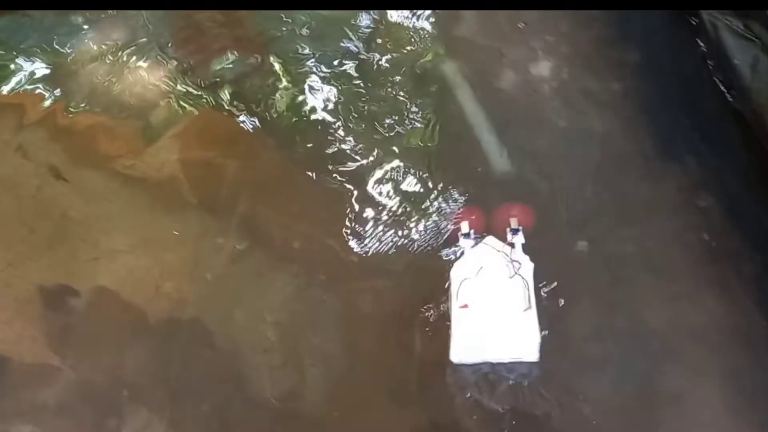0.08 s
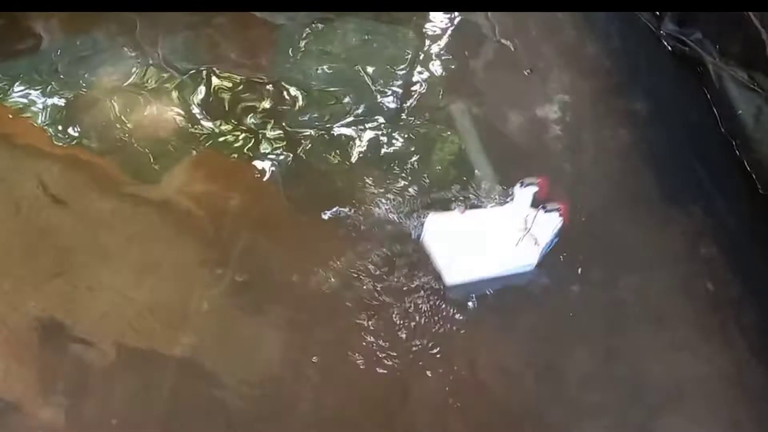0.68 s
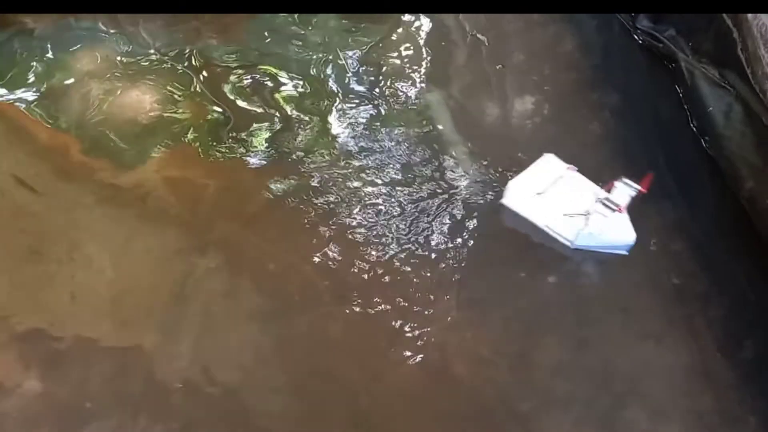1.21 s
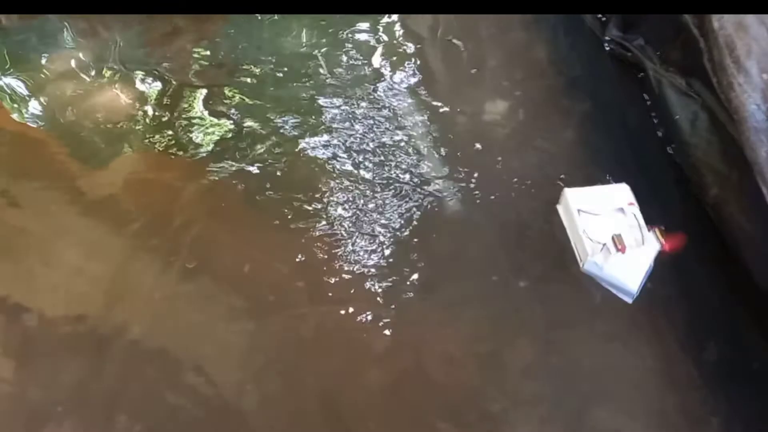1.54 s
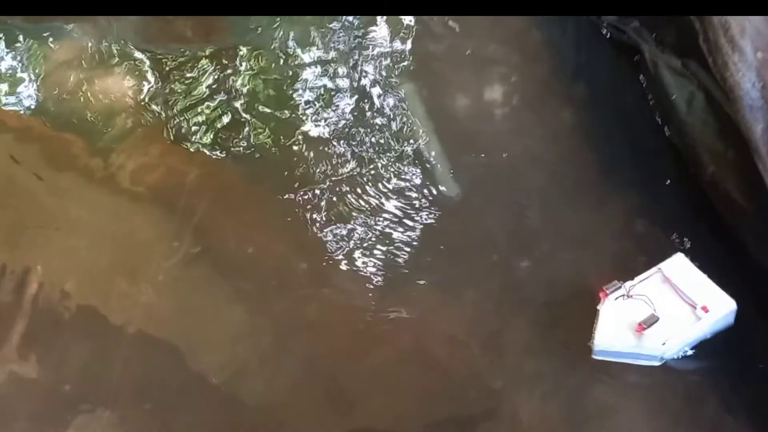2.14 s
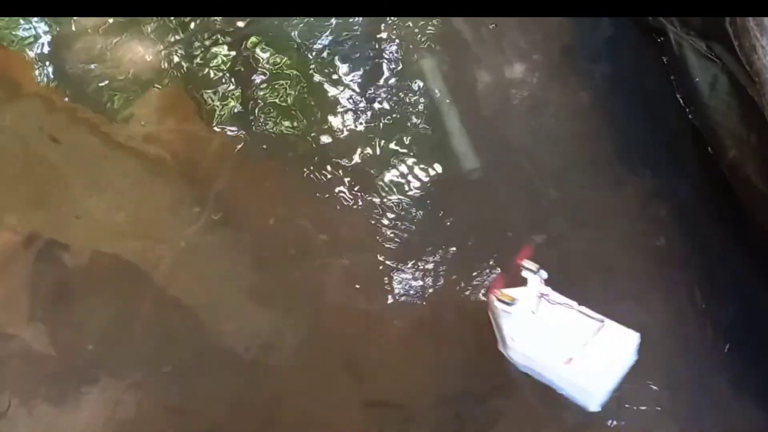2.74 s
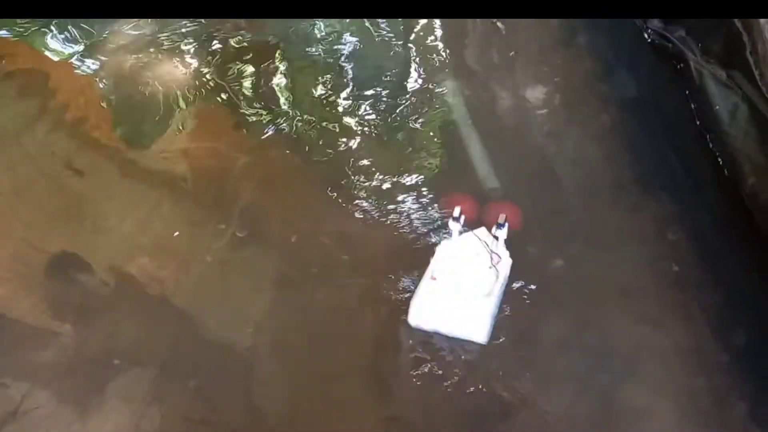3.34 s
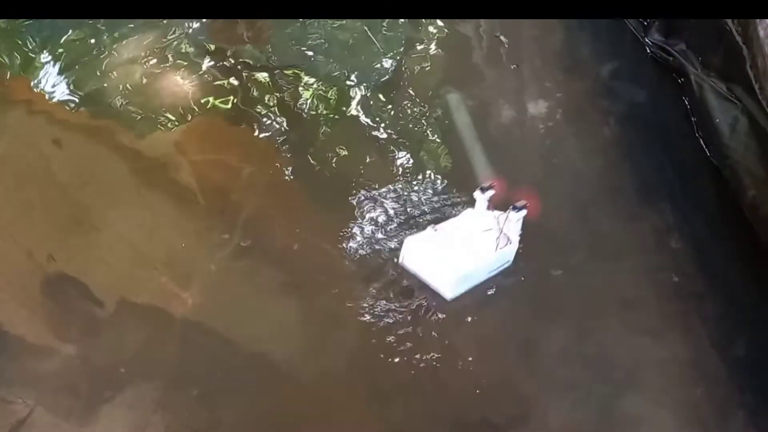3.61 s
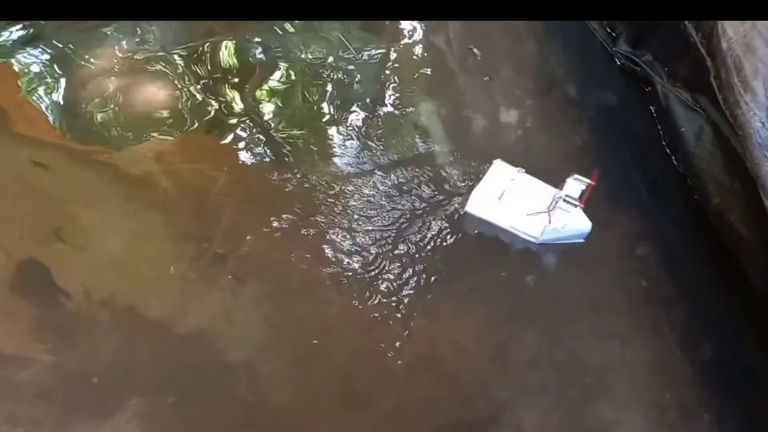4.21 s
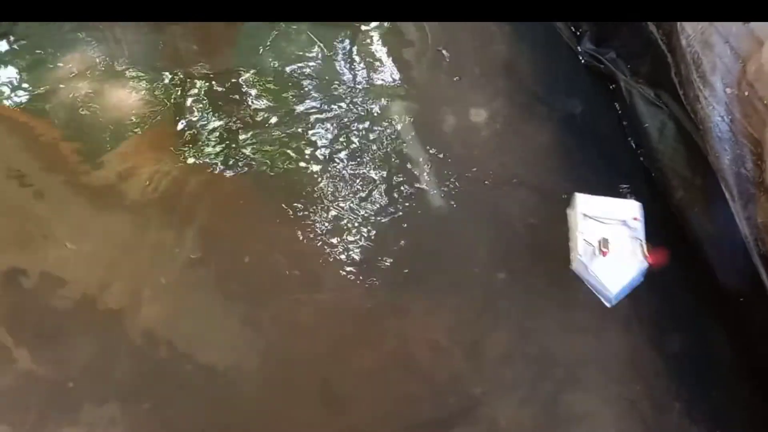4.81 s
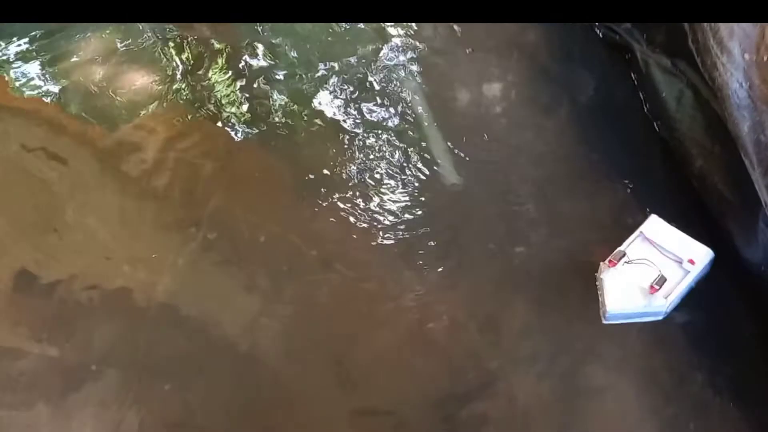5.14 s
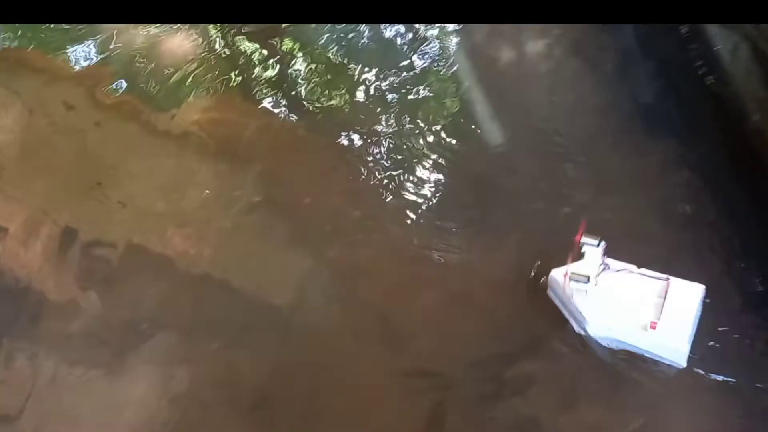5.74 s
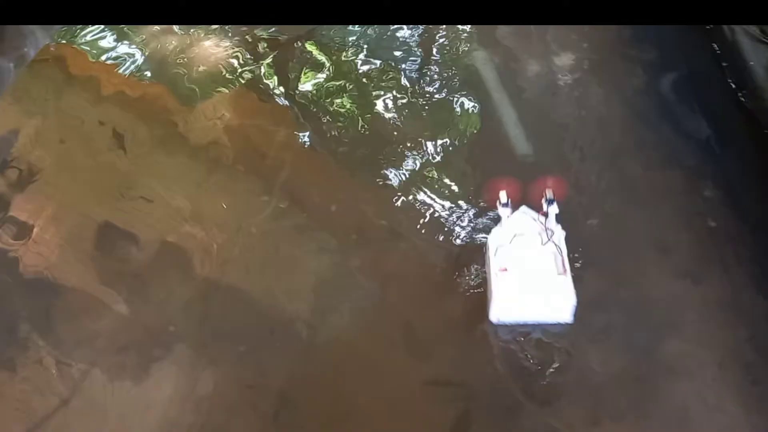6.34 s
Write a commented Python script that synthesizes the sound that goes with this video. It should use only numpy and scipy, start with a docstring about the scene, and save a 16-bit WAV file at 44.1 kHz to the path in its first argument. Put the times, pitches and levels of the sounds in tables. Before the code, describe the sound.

A steady, whining buzz with a fizzy hiss comes from the two electric air propellers of a toy foam boat, heard in stereo. The pitch barely changes, but overtones swell and fade as the boat goes round on the water. Short, light splashes occur early, near the middle and near the end, and a plop follows the middle ones. The background holds only a quiet rumble and a few soft thumps.

```python
"""On a pool, a toy foam boat goes in circles, pushed by two small electric motors with air propellers.
The motors whine about 20 turns a second apart, so their tones beat against each other.
As the boat swings round, each overtone sweeps past like the beam of a lighthouse.
Blades and motor brushes hiss, and the foam hull rings along. Behind it all lies a low rumble
with soft thumps, and the water gives a few splashes and plops."""
import sys
import numpy as np
from scipy import signal
from scipy.fft import rfft, irfft
from scipy.io import wavfile

SR = 44100
rng = np.random.default_rng(int(sys.argv[2]) if len(sys.argv) > 2 else 0)


def bounce(signal):
    """Save signal as a 16-bit WAV file at the path given by the first command-line argument."""
    frames = np.transpose(np.atleast_2d(signal))
    limited = np.clip(frames, -1, 1)
    pcm = np.round(limited * 32767).astype(np.int16)
    wavfile.write(sys.argv[1], SR, pcm)


N = 289296
T = np.arange(N) / SR
HZ = np.fft.rfftfreq(N, 1 / SR)


def gain_of(db):
    """Turns decibels into a number to multiply a sound by."""
    return 10 ** (np.asarray(db) / 20)


def evened(x):
    """Scales a signal so that its average size (rms) is 1."""
    return x / np.sqrt(np.mean(abs(x) ** 2) + 1e-20)


def at_hz(rows, hz):
    """Looks up a table by frequency, sliding between rows on a scale of octaves."""
    f, value = np.transpose(rows)
    return np.interp(np.log(hz + 1), np.log(f + 1), value)


def at_time(rows, t):
    """Looks up a table by time, sliding between rows."""
    return np.interp(t, *np.transpose(rows))


def pan(balance_db):
    """Left and right gains; a positive balance is louder on the left."""
    return gain_of([[balance_db / 2], [-balance_db / 2]])


def colour(x, spectrum):
    """Turns each frequency up or down as a table says."""
    return irfft(rfft(x) * gain_of(at_hz(spectrum, HZ)), N)


def wander(rate_hz):
    """A smooth random wobble, up to about the given rate."""
    return evened(irfft(rfft(rng.standard_normal(N)) / (1 + (HZ / rate_hz) ** 4), N))


# How alike left and right are: f/Hz, likeness (1 = the same)
LIKENESS = [(40, .3), (90, 0.77), (300, 0.54), (900, 0.68), (2000, 0.43), (4000, 0.039), (10000, 0.01)]

def noise(spectrum):
    """Stereo noise, partly alike on both sides in the bass and unrelated in the treble."""
    left, other = rfft(rng.standard_normal((2, N)))
    alike = at_hz(LIKENESS, HZ)
    right = alike * left + np.sqrt(1 - alike ** 2) * other
    return evened(irfft(np.array([left, right]) * gain_of(at_hz(spectrum, HZ)), N))


# Where the boat points: t/s, heading/laps
HEADING = [(0, 0), (3.13, 1), (6.33, 2), (6.56, 2)]

def facing(t, crest):
    """1 when the boat points at the heading `crest`, -1 half a lap later."""
    return np.cos(2 * np.pi * (at_time(HEADING, t) - crest))


def echoes(heading, swings_per_lap, paths=10):
    """Echoes off water and walls add up and cancel as the boat turns."""
    rates = rng.standard_normal((2, paths, 1)) * swings_per_lap
    starts = rng.random((2, paths, 1))
    return evened(np.exp(2j * np.pi * (rates * heading + starts)).sum(1))


def flutter(t, rate_hz):
    """Uneven air at the blades quickly shakes a tone's level and phase."""
    hz = np.fft.fftfreq(len(t), t[1])
    shake = rng.standard_normal((2, len(t), 2)) @ [1, 1j]
    return evened(np.fft.ifft(np.fft.fft(shake) / (1 + (hz / rate_hz) ** 2)))


def sweep(beams, harmonic, heading, gap_db=-14, fill_db=0.78):
    """A harmonic swells as its beams swing past; echoes fill the gaps more for higher ones."""
    power = gain_of(gap_db + fill_db * harmonic) ** 2
    for _, crest, width, db, balance_db in beams:
        away = (heading - crest + .5) % 1 - .5
        power = power + (gain_of(db) * pan(balance_db)) ** 2 * np.exp(-(away / width) ** 2)
    return np.sqrt(power)


def shaft(speed_hz, jitter, sway):
    """Counts a shaft's turns; its loose bearing adds quick jitter and slower sway."""
    return np.cumsum(speed_hz) / SR + jitter * wander(100) + sway * wander(23)


# How far the sound at the right microphone is ahead of the left: f/Hz, phase/radians
RIGHT_LEAD = [(320, 0.09), (630, 0.65), (970, 0.68), (1220, 1.5), (1615, 1.58), (1830, 1.3), (2200, 0.61),
              (2900, 1.18), (3550, 2.03), (4200, 1.43)]

def whine(turns, speed_hz, levels_db, beams, count, top_db, octave_db, scatter, rough, flutter_hz,
          balance_db, growth_db_per_s=0.48, ripple=0.042, rasp_db=0.5):
    """One motor's harmonics: tones at 1, 2, 3... times its speed that swell and fade as the boat turns."""
    t = T[::128]  # loudness needs fewer time steps than the wave
    heading = at_time(HEADING, t)
    spin = np.exp(2j * np.pi * turns)
    tone, out = np.ones(N, complex), np.zeros((2, N))
    listed = len(levels_db)
    for k in range(1, count + 1):
        tone = tone * spin  # step up to harmonic k
        db = levels_db[k - 1] if k <= listed else top_db + octave_db * np.log2(k / listed)
        if k in (3, 5, 6, 7):  # the main whine slowly grows
            db = db + growth_db_per_s * (t - t.mean())
        echo = echoes(heading, 2.501 + .35 * k)
        own_beams = [beam for beam in beams if beam[0] == k]
        if own_beams:
            gain = sweep(own_beams, k, heading)
            # echoes shift the phase, most for high harmonics and between beams
            twist = scatter * (k - 1) * echoes(heading, 2.211).real / (.5 + gain)
            gain = gain * np.exp(1j * twist) * evened(1 + ripple * (k - 1) * echo)
        else:
            direct = 1.73 * np.exp(-k / 9)
            gain = evened(direct + echo) * pan(balance_db)
            if k > 8:  # the rasp is strongest with the propellers face on
                db = db + rasp_db * facing(t, 0.02)
        fuzz = min(rough * k, .8)
        gain = gain * (1 + fuzz * flutter(t, flutter_hz))
        phase = 2 * np.pi * rng.random() + at_hz(RIGHT_LEAD, k * speed_hz) * np.array([[0], [1]])
        gain = gain * np.exp(1j * phase) * np.sqrt(2) * gain_of(db)
        out += [(np.interp(T, t, side) * tone).real for side in gain]
    return out


# How fast each motor spins: t/s, f/Hz
FAST_SPIN = [(0.0, 321.8), (0.24, 322.1), (0.88, 325.0), (1.12, 322.6), (1.36, 323.8), (1.44, 323.2),
             (2.24, 325.1), (2.96, 322.7), (3.04, 325.6), (3.12, 323.5), (3.52, 325.5), (4.0, 321.0),
             (4.56, 322.7), (4.96, 320.6), (5.6, 322.7), (5.68, 321.3), (6.24, 322.6), (6.56, 321)]
SLOW_SPIN = [(0.0, 301.7), (0.16, 305), (1.52, 304.3), (1.6, 307.8), (2.4, 302.3), (2.72, 305.2),
             (2.8, 304), (3.12, 305.4), (3.28, 302.7), (3.44, 305), (3.84, 303.4), (4.32, 306.2),
             (4.48, 301.7), (4.64, 304.4), (5.12, 302.2), (5.76, 301.3), (6.08, 296.1), (6.56, 301)]
# Base strength of harmonics 1, 2, 3...: level/dB
FAST_HARMONICS = [-59.5, -49.5, -39.5, -52.5, -41, -46.5, -47, -51, -46, -52.5, -48.5, -50.5, -49.5, -53.5,
                  -53.5, -58, -56, -59, -59, -56]
SLOW_HARMONICS = [-68, -52, -60.5, -53, -52.5, -45.5, -50.5, -57, -55, -61.5, -68, -57.5, -58, -61, -66,
                  -60.5, -66.5, -69, -57, -56]
# Beams of sound leaving each propeller: harmonic, heading/laps, half width/laps, boost/dB, balance/dB
FAST_PROPELLER_BEAMS = [(1, 0.25, 0.091, 7, -1.5), (1, 0.665, .09, -1.5, -2), (1, 0.916, 0.068, -3, -3),
                        (2, 0.22, .09, 2, 1.5), (2, .62, .115, 5, -3.5), (3, 0.062, 0.088, -0.4, 6.5),
                        (3, 0.36, 0.11, 2.5, 1.5), (3, 0.76, 0.064, -1, 10.5), (3, 0.85, 0.096, -3, -15),
                        (5, 0.098, 0.038, 3, -4.5), (5, .26, 0.048, 2.5, 4.5), (5, 0.42, 0.066, -3.5, -9.5),
                        (5, 0.67, .13, 0, 7.5), (5, 0.96, 0.09, 1.5, -4.5), (6, 0.59, 0.19, 0.5, 1.5),
                        (7, .12, 0.087, -2.5, -11.5), (7, 0.35, 0.097, -2, -6),
                        (7, 0.644, 0.041, 5.5, -3.5), (7, .79, 0.068, 0.5, -4), (9, 0.024, 0.056, -5, -9),
                        (9, 0.22, 0.055, -0.5, -10), (9, 0.44, 0.17, -3, -12.5), (9, .9, 0.054, -2.5, -5.5),
                        (11, 0.1, 0.11, 1, -10), (11, 0.25, 0.087, -5.5, 12.5), (12, 0.063, 0.086, 2, -4),
                        (12, .28, .08, -2, 0), (13, 0.099, 0.088, 0.5, -4), (13, 0.37, .17, -4, -12),
                        (13, 0.93, 0.03, 2.5, 6)]
SLOW_PROPELLER_BEAMS = [(2, 0.47, 0.13, 2, 4.5), (2, 0.888, 0.13, 3.5, -0.5), (4, 0.16, 0.19, -3.5, -11.5),
                        (4, 0.41, .085, 0, 9), (4, .57, 0.063, 7, -3), (6, 0.18, 0.035, -2, 13),
                        (6, 0.363, .043, 3, -8), (6, 0.49, 0.15, 3, 3.5), (6, 0.93, 0.077, -0.5, -6.5),
                        (7, 0.4, 0.19, -1.5, -11), (7, .622, 0.033, 2.5, -10), (7, .752, .15, -0.5, -10)]

def motors():
    """Two motors beat and waver as the boat rocks. Gives their sound and the faster one's turns."""
    fast_hz = at_time(FAST_SPIN, T) + 0.2002 * wander(3.9)
    slow_hz = at_time(SLOW_SPIN, T) + 0.352 * wander(3.9)
    fast_turns = shaft(fast_hz, jitter=0.001, sway=0.0049)
    slow_turns = shaft(slow_hz, jitter=0.0024, sway=0.0092)
    fast = whine(fast_turns, fast_hz.mean(), FAST_HARMONICS, FAST_PROPELLER_BEAMS, count=46, top_db=-60,
                 octave_db=-3.5, scatter=0.21, rough=0.047, flutter_hz=30, balance_db=-2.5)
    slow = whine(slow_turns, slow_hz.mean(), SLOW_HARMONICS, SLOW_PROPELLER_BEAMS, count=22, top_db=-66,
                 octave_db=-8, scatter=0.2, rough=0.055, flutter_hz=24.4, balance_db=-3.5)
    return fast + slow, fast_turns


# Tone colour of the rushing air: f/Hz, relative level/dB
AIR_COLOUR = [(150, -29), (450, -19), (620, -5.5), (730, -22), (810, -19), (880, -6.5), (980, -6),
              (1280, -2), (1420, -8.5), (1600, -9), (1730, -6), (2400, -0.5), (3400, -3.5), (6500, -2),
              (9000, -7), (16000, -14.5)]

def air(turns, level_db=-43, chop=0.2, flicker_db=2.13):
    """Swirling air rushes off the blades, chopped twice a turn as they pass."""
    blade_pulse = 1 + chop * np.cos(4 * np.pi * turns)
    white = noise([(20, 0), (20000, 0)])
    rush = evened(colour(white * blade_pulse, AIR_COLOUR))
    return gain_of(level_db + flicker_db * wander(48)) * rush * pan(-2)


# The notes at which the foam rings: f/Hz, width/Hz, base level/dB
HULL_NOTES = [(1054, 40, -67), (1572, 21, -53.5), (1874, 73, -52), (2226, 91, -53)]

def hull(random_swell_db=2, lap_swell_db=2.5):
    """The rattling motors keep the foam ringing; it swells once a lap and a little by chance."""
    out = np.zeros((2, N))
    for hz, width, db in HULL_NOTES:
        rattle = rfft(rng.standard_normal((2, N)))
        ring = irfft(rattle / (1 + (2 * (HZ - hz) / width) ** 2), N)
        out += gain_of(db) * evened(ring * gain_of(random_swell_db * wander(1.5)))
    return out * pan(-4.5) * evened(gain_of(lap_swell_db * facing(T, 0.63)))


# Tone colour of the brushes' fizz: f/Hz, relative level/dB
BRUSH_COLOUR = [(4000, -36), (8500, -14.5), (10100, -13.5), (10850, 2.5), (11700, -11), (13500, -7),
                (15500, -10.5)]
# How the fizz rises and falls: t/s, base level/dB
BRUSH_LEVEL = [(0, -47), (.15, -49), (.55, -45), (1.2, -43.5), (2.14, -42.5), (2.24, -45.5), (3.2, -45),
               (4.5, -46), (5.41, -43.5), (5.5, -47.5), (6.05, -45.5), (6.3, -51), (6.56, -51)]

def brushes(turns, boost_db=2.6, pulsing=.2):
    """Brushes scrape the motor's spinning contacts, harder once in each turn."""
    pressure = 1 + pulsing * np.cos(2 * np.pi * turns)
    scrape = evened(noise(BRUSH_COLOUR) * pressure)
    return gain_of(at_time(BRUSH_LEVEL, T) + boost_db) * scrape * pan(-2)


# Tone colour of the background: f/Hz, relative level/dB
RUMBLE_COLOUR = [(20, -18), (55, -11), (87, 3.5), (115, -6), (160, -10.5), (250, -12), (500, -14),
                 (1200, -26)]

def rumble(level_db=-61, swell_db=2):
    """The surroundings murmur, low and uneven."""
    return gain_of(level_db + swell_db * wander(8.7)) * noise(RUMBLE_COLOUR)


# Slaps of water: loudest t/s, half length/s, middle f/Hz, spread/octaves, level/dB, balance/dB
WATER_SLAPS = [(0.257, 0.031, 380, 1.3, -57, -15), (.85, 0.026, 2000, 1.5, -39, -3),
               (1.168, 0.014, 1400, 1.9, -34, -1), (1.501, 0.0048, 900, .6, -48, 4),
               (2.221, 0.016, 4540, .6, -49, 0), (2.771, 0.018, 3800, 0.65, -39, -5),
               (2.96, .022, 2200, 1.85, -39, 4), (3.606, 0.0052, 650, 0.24, -43, -4.5),
               (3.665, 0.017, 800, 0.97, -43.5, -2), (5.099, 0.026, 700, .5, -50, 0),
               (5.931, 0.0042, 650, .7, -43.5, -16), (6.086, 0.0058, 2000, 1.6, -37.5, -2)]

def splashes():
    """Water slaps and sprays in short bursts of noise."""
    out = np.zeros((2, N))
    drops = rfft(noise([(100, -8.5), (16000, -1.5)]))
    for crest, half_length, hz, spread, db, balance_db in WATER_SLAPS:
        band = np.exp(-.5 * (np.log2((HZ + 1) / hz) / spread) ** 2)
        spray = evened(irfft(drops * band, N))
        swell = np.exp(-.5 * ((T - crest) / half_length) ** 2)
        out += gain_of(db) * spray * swell * pan(balance_db)
    return out


def blip(start, start_hz, end_hz, length, db, balance_db, rise):
    """A short tone that can glide; it peaks after the share `rise` of its length, then dies away."""
    age = np.maximum(T - start, 0) / length
    hz = start_hz + (end_hz - start_hz) * np.minimum(age, 1)
    swell = (age / rise * np.exp(1 - age / rise)) ** 2
    tone = np.sin(2 * np.pi * np.cumsum(hz * (age > 0)) / SR)
    return gain_of(db) * swell * tone * pan(balance_db)


# Thumps in the background: t/s, f/Hz, length/s, peak level/dB, balance/dB
SOFT_THUMPS = [(0.288, 80.6, 0.076, -44, -23), (0.589, 84.4, 0.077, -50, 0), (1.244, 90, .06, -51, 0),
               (3.619, 80.5, 0.059, -46, -1), (5.928, 86.6, 0.092, -50, -12)]

def thumps():
    """Each soft thump is a brief, low tone of steady pitch."""
    return sum(blip(start, hz, hz, length, db, balance_db, rise=0.21)
               for start, hz, length, db, balance_db in SOFT_THUMPS)


# Air trapped in the water: t/s, start f/Hz, end f/Hz, length/s, peak level/dB, balance/dB
AIR_POCKETS = [(3.602, 445, 365, .036, -31.5, -3), (3.661, 405, 430, .026, -47.5, -2),
               (4.213, 385, 420, .026, -50, -2), (4.64, 320, 255, .09, -49, -7),
               (4.70, 270, 335, .08, -50, -7), (6.137, 405, 450, .03, -51.5, -3)]

def plops():
    """Each pocket of air rings for a moment, sliding up or down in pitch."""
    return sum(blip(*pocket, rise=0.25) for pocket in AIR_POCKETS)


def scene():
    """The circling boat, with the water and the background around it."""
    whining, fast_turns = motors()
    boat = whining + air(fast_turns) + hull() + brushes(fast_turns)
    return boat + splashes() + rumble() + thumps() + plops()


# A dip in the microphones' treble: f/Hz, gain/dB
MIC_DIP = [(6500, -0.5), (7050, -1.5), (7400, -9), (8200, -7.5), (8700, -4), (9500, -1)]

def record(dry, cutoff_hz=15500):
    """The microphones soften one band of treble, then the very highest sounds are cut off."""
    heard = colour(dry, MIC_DIP)
    low_pass = signal.firwin(511, cutoff_hz, window=("kaiser", 9), fs=SR)
    return signal.oaconvolve(heard, low_pass[None], "same")


dry = scene()
out = record(dry)
bounce(out)
```